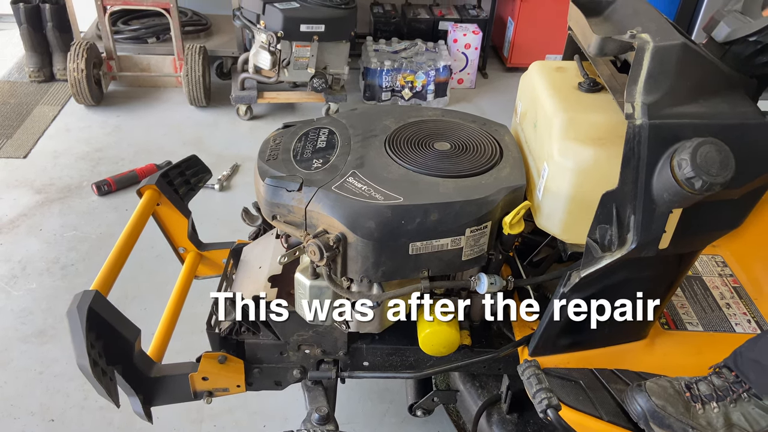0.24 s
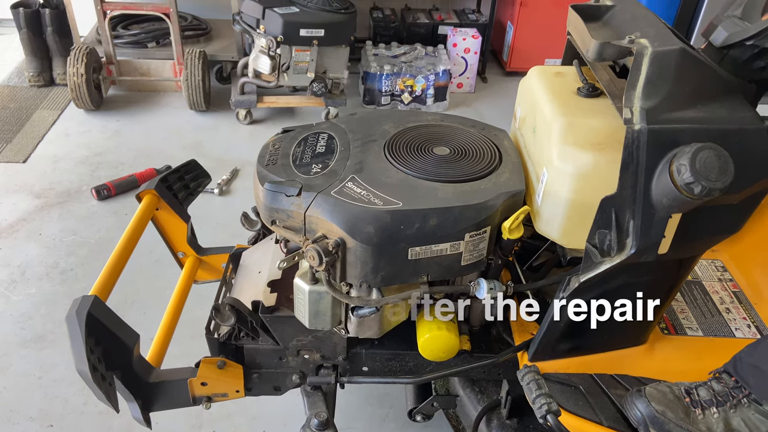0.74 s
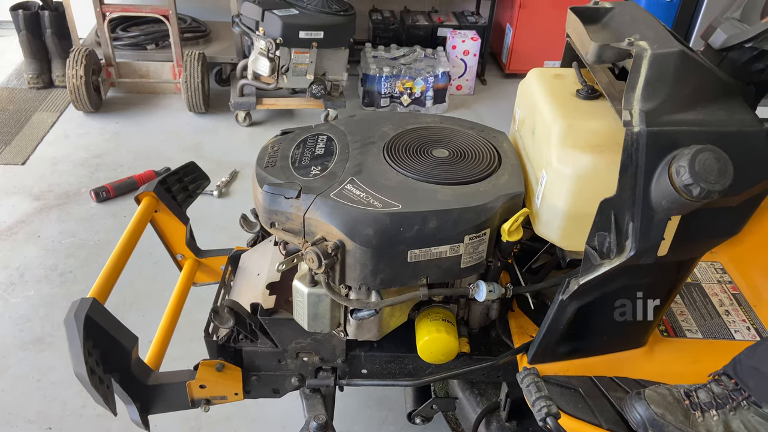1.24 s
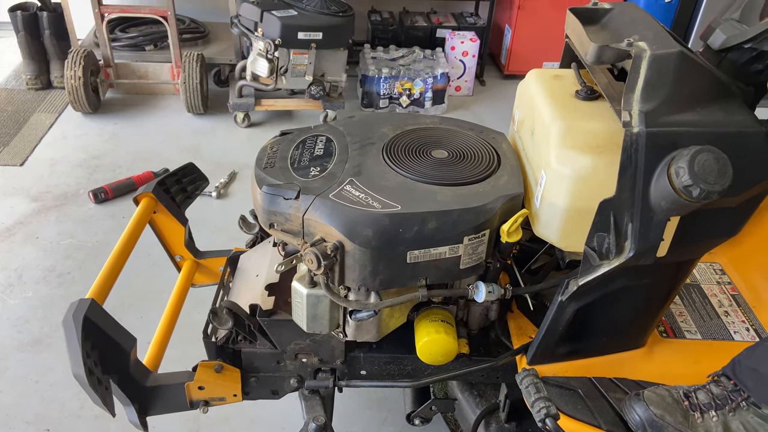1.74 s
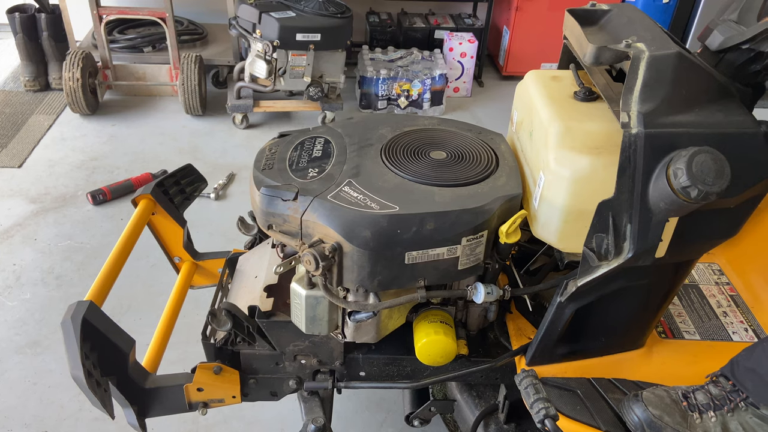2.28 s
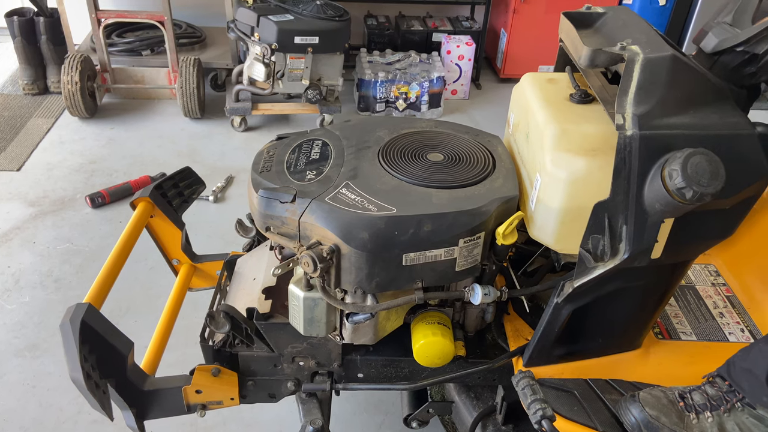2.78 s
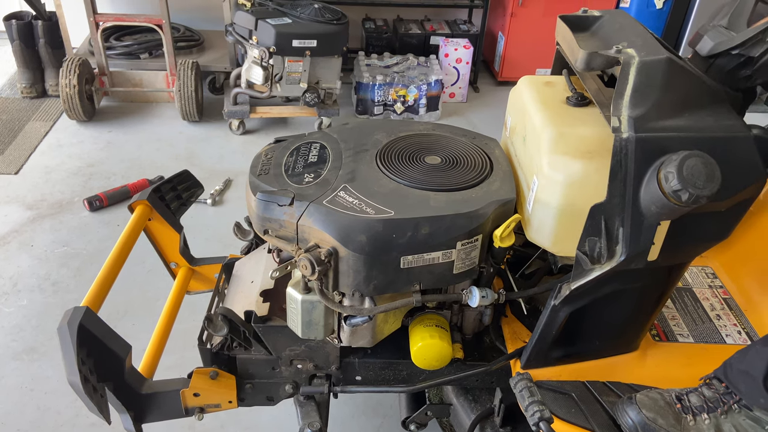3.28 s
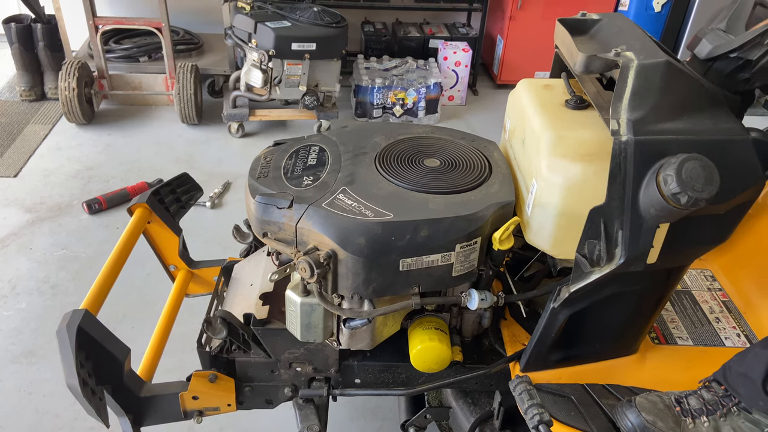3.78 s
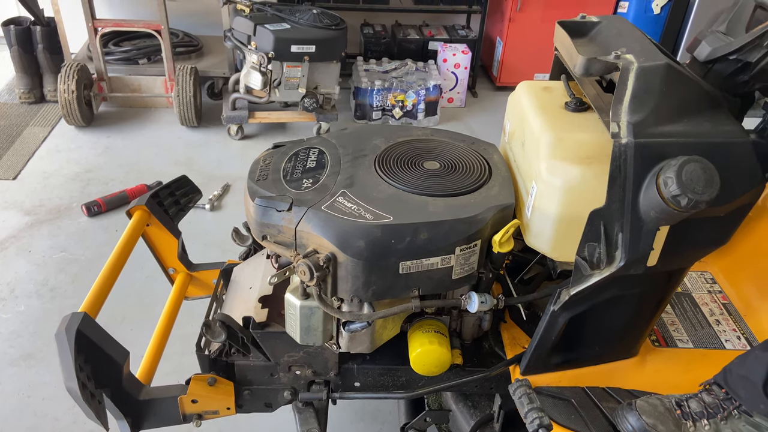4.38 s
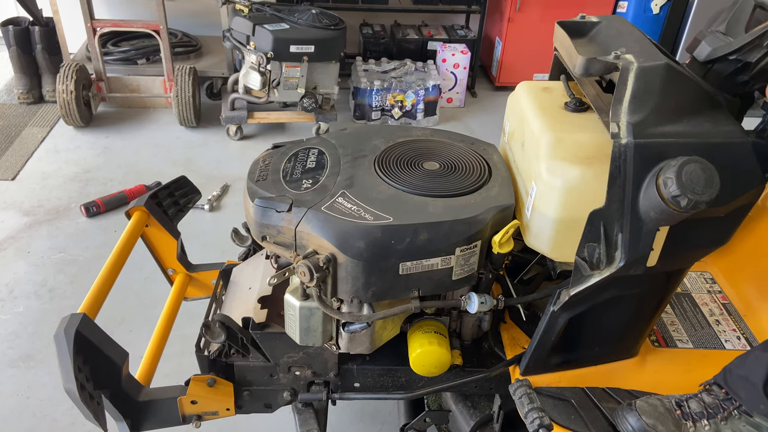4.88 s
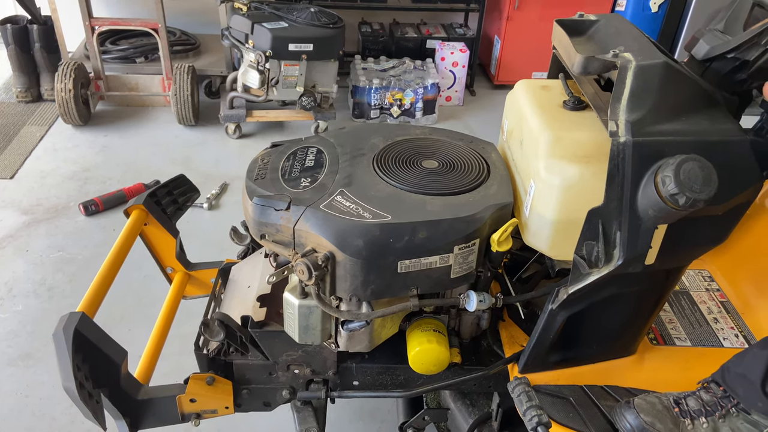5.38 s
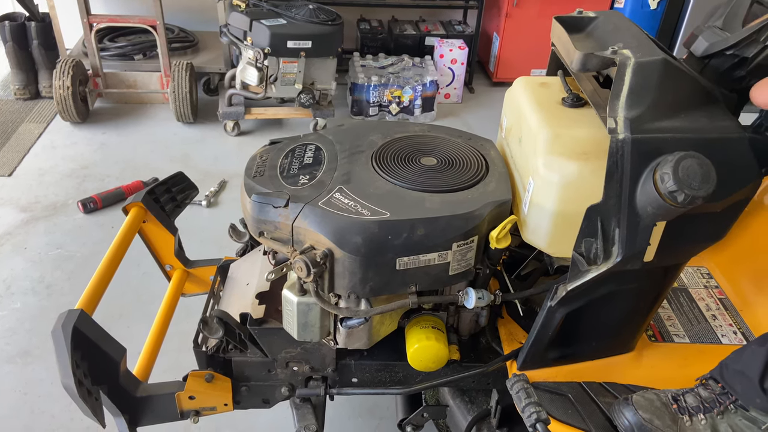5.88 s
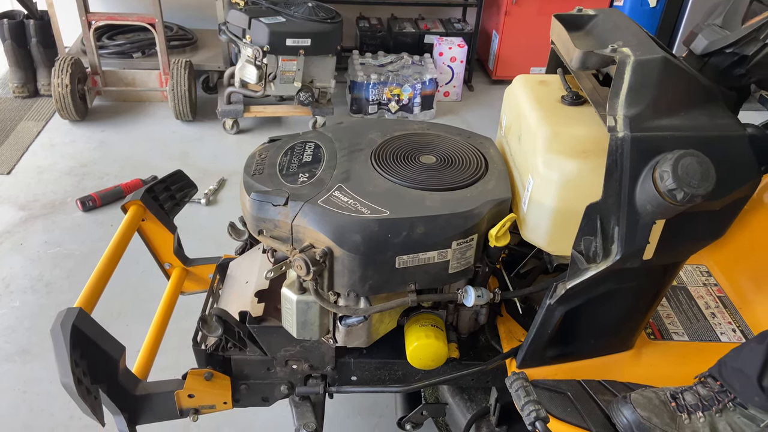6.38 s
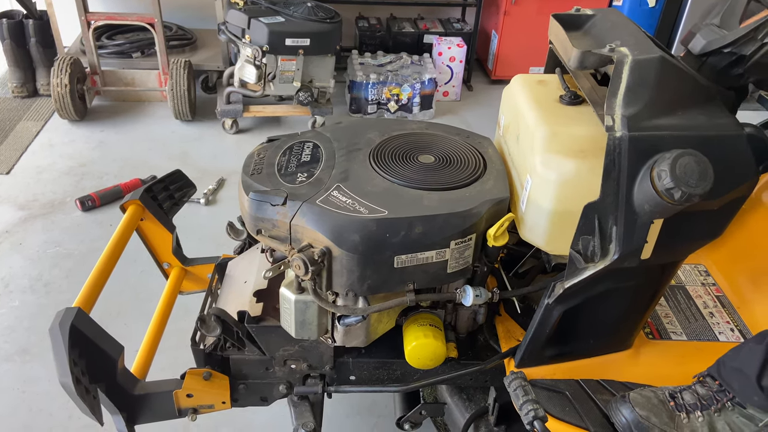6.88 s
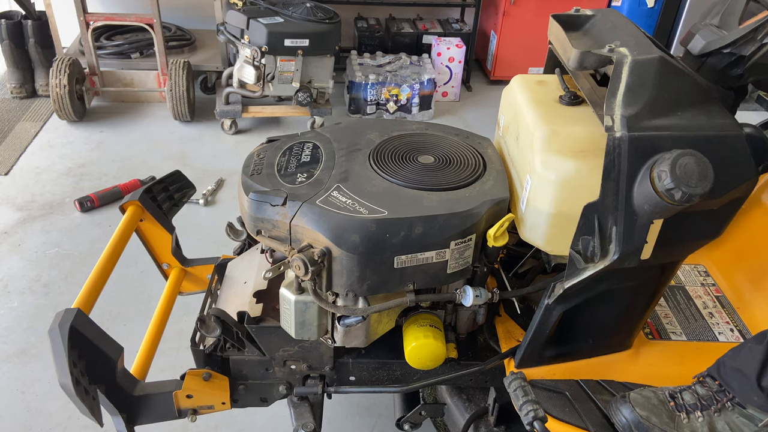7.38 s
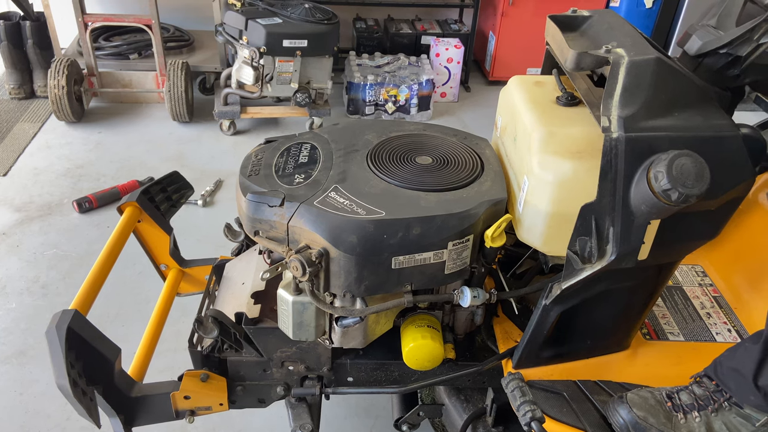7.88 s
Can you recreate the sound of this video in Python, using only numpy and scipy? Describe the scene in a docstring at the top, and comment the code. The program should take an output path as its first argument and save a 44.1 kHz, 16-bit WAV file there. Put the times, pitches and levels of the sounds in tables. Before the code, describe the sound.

Small V-twin mower engine starts, idles fast and lumpy, snorts into two held high-speed runs with falls between, then is switched off.

```python
"""A starter whirrs, a small V-twin petrol engine catches, and it runs up to a fast idle with uneven chugging.
The throttle opens and the intake snorts; held speed is a drone, and the fall back to idle is a hum, then chugs.
A second rev-up does the same; at last the ignition goes off and the engine coasts down.
The exhaust is made of muffler rings and of tones at multiples of the engine cycle.
Fan, valves and tinwork are shaped noise, with knocks, taps and whistles, that follow the crank speed."""
import sys
import numpy as np
from scipy import signal
from scipy.fft import rfft, irfft, next_fast_len
from scipy.io import wavfile
from scipy.ndimage import uniform_filter1d

SR = 44100
rng = np.random.default_rng(int(sys.argv[2]) if len(sys.argv) > 2 else 0)


def unload_audio(sound):
    """Save the sound as a 16-bit wav file, at the path given as the first command line argument."""
    columns = np.transpose(np.atleast_2d(sound))
    # keep every value between -1 and 1, then stretch to whole-number steps
    steps = np.round(np.clip(columns, -1, 1) * 32767)
    wavfile.write(sys.argv[1], SR, steps.astype(np.int16))


N = 358974
T = np.arange(N) / SR  # time [s]

# each rev-up: (throttle opens [s], governed speed reached [s], throttle shuts [s],
# governed speed [rpm], sag [rpm per s])
REV_UPS = [(1.038, 1.256, 2.342, 3102.1, 18.1), (4.191, 4.543, 6.453, 3108.5, 18.9)]
# tinwork that colours the noise: (frequency [Hz], width [Hz], boost [dB])
TINWORK = [(423, 25, 4.5), (923, 11.5, 5), (1227, 19, 4.5), (1790, 48, 0), (4520, 310, 2.5)]
IGNITION_OFF_S = 7.771
SECOND_PLACE = 270 / 720  # the second cylinder fires 270 of the 720 crank degrees into the cycle
CYLINDER_PLACES = (0, SECOND_PLACE)


def gain_of(db):
    """Turns decibels into a factor."""
    return 10 ** (np.asarray(db) / 20)


def evened(x):
    """Scales a signal to an rms of 1."""
    return x / np.sqrt(np.mean(x ** 2) + 1e-20)


def ramp(start, length):
    """Rises from 0 to 1 over a length of time, both in seconds."""
    return np.clip((T - start) / length, 0, 1)


def read(points, hz):
    """Reads a spectrum between its points on a log-frequency axis."""
    f, value = np.transpose(points)
    return np.interp(np.log(hz + 1), np.log(f + 1), value)


def drift(hz):
    """Slow random wandering of rms 1, no faster than about hz."""
    lowpass = signal.butter(2, hz, fs=SR / 100, output="sos")
    slow = signal.sosfiltfilt(lowpass, rng.standard_normal(N // 100 + 1))
    return evened(slow).repeat(100)[:N]


def coloured(points, bumps=()):
    """Two unrelated noises with one spectrum: a smooth curve with resonance bumps on it."""
    size = next_fast_len(N)
    hz = np.fft.rfftfreq(size, 1 / SR)
    db = read(points, hz) + sum(d / (1 + (2 * (hz - f) / w) ** 2) for f, w, d in bumps)
    white = rfft(rng.standard_normal((2, size)))
    return evened(irfft(white * gain_of(db), size)[:, :N])


def sounding(rows, fade):
    """Gain that slides from a start to an end level in each row and fades at both ends."""
    total = 0
    for start, end, start_db, end_db in rows:
        slide = gain_of(start_db + (end_db - start_db) * ramp(start, end - start))
        total = total + slide * ramp(start, fade) * (1 - ramp(end - fade, fade))
    return total


def gate(turns, depth, place, sharp):
    """Level swing within a cycle: one puff a cylinder that jumps up and dies away."""
    puffs = sum(np.exp(-((turns - place - p) % 1) / sharp) for p in CYLINDER_PLACES)
    return evened(1 + depth * puffs)


def orders(turns, table, lag, waver_db, bend=0, drag=0, twist=0, second=0.93):
    """Tones at multiples of the cycle, phased as a pair of blows the pipe smears; each wavers in level."""
    total = 0
    for k, db in table:
        pair = np.angle(1 + second * np.exp(-2j * np.pi * k * SECOND_PLACE))
        smear = bend * (k - 4.5) ** 2 + twist * (k - 4.5) ** 3 + drag * max(5 - k, 0)  # in turns
        level = gain_of(db + waver_db * drift(4.7))
        wave = np.cos(2 * np.pi * (k * turns + lag) + pair - 2 * np.pi * smear)
        total = total + np.sqrt(2) * level * wave
    return total


def crank_rpm():
    """Catch, then each rev-up climbs, is held by the governor and falls back to idle; at last it coasts."""
    # the engine catches and runs up to a fast idle: (time [s], crank speed [rpm])
    run_up = [(0, 976.9), (.15, 1129.3), (.3, 1584.2), (.6, 2044.2), (.75, 2153.2), (.9, 2178.3),
              (1.04, 2128.7)]
    # climb to governed speed: (share of the climb's time [0-1], share of its rpm [0-1])
    climb_curve = [(0, 0), (.3, .234), (.75, .793), (1, 1)]
    # fall to idle: (time after the throttle shuts [s], share of rpm above idle [0-1])
    fall_curve = [(0, 1), (.12, .85), (.6, .316), (.75, .22), (1.05, .068), (1.3, 0)]
    idle_rpm, coast_rpm_per_s = 1779.7, 1101
    rpm = np.interp(T, *np.transpose(run_up))
    for opens, reached, shuts, top, sag in REV_UPS:
        held = top - sag * np.clip(T - reached, 0, shuts - reached)
        climb = np.interp(ramp(opens, reached - opens), *np.transpose(climb_curve))
        fall = np.interp(T - shuts, *np.transpose(fall_curve))
        rising = rpm + (held - rpm) * climb
        falling = idle_rpm + (held - idle_rpm) * fall
        rpm = np.where(T < shuts, rising, falling)
    return rpm - coast_rpm_per_s * np.maximum(T - IGNITION_OFF_S, 0)


def spread(pair_in):
    """Two microphones: they share part of each sound, with a lead and a lean that depend on frequency."""
    # likeness of the two sides: (frequency [Hz], share in common [0-1])
    likeness = [(60, 0.89), (130, 0.91), (300, 0.62), (700, 0.39), (1700, 0.47), (2800, 0.4), (4500, 0.075),
                (6000, 0.012), (7000, 0.74), (9300, 0.92), (11000, 0.43), (12200, 1), (13300, .97),
                (14200, 0.75), (15200, 1)]
    # how far left is ahead: (frequency [Hz], phase [radians])
    left_lead = [(0, 0), (1400, 0), (2600, 1), (4200, 0.5), (5300, -2.5), (6700, -0.56), (8500, -2),
                 (9500, -3), (10400, -6.5), (11900, -6), (12600, -9), (14100, -8.5), (14600, -11)]
    # how much louder left is: (frequency [Hz], left over right [dB])
    left_lean = [(40, -7), (60, -9), (130, 8.5), (290, -1.5), (640, 1.5), (1410, 0), (3100, 3), (6820, 2.5),
                 (15000, -1)]
    patchy_db = 1.1  # parts of the spectrum swell and sink for a moment
    hz, _, z = signal.stft(pair_in, SR, nperseg=1024)
    patches = rng.standard_normal(z.shape[1:])
    patches = uniform_filter1d(uniform_filter1d(patches, size=7, axis=0), size=2, axis=1)
    z = z * gain_of(patchy_db * evened(patches))
    # each side takes half of the lean and half of the lead
    turn = gain_of(read(left_lean, hz) / 2) * np.exp(.5j * np.interp(hz, *np.transpose(left_lead)))
    turn = turn[:, None]
    same = np.clip(read(likeness, hz), 0, 1)[:, None]
    left = z[0] * turn
    right = (same * z[0] + np.sqrt(1 - same ** 2) * z[1]) / turn
    return signal.istft(np.array([left, right]), SR, nperseg=1024)[1][:, :N]


def starter():
    """Starter gears whirr: noise with metallic resonances that swells a little, then fades out."""
    # gear noise: (frequency [Hz], level [dB per Hz])
    gear_noise = [(150, -30), (500, -20), (1400, -1.5), (3500, -9.5), (8000, -20), (16000, -28)]
    # resonances: (frequency [Hz], width [Hz], boost [dB])
    gear_rings = [(990, 40, 5), (1370, 70, 12), (2080, 180, 9), (2440, 40, 7), (2610, 50, 9),
                  (3400, 120, 11), (3630, 50, 9), (4460, 60, 7)]
    swell = gain_of(-30.0 + 6.4 * ramp(0.045, 0.069))
    fade_out = np.clip((.42 - T) / 0.25, 0, 1)
    return coloured(gear_noise, gear_rings) * swell * fade_out


def tones(turns, pace):
    """Fan blades sing on high multiples of the cycle; fuzzy whistles keep their pitch and flutter."""
    # fan tones: (multiple of the cycle, level at full speed [dB])
    fan_tones = [(36, -46), (42, -50), (64, -52.5), (72, -45)]
    # whistles: (frequency [Hz], width [Hz], level at idle [dB], level at speed [dB],
    # extra level, doubled in the first second [dB], clean share [0-1], pitch wander [Hz], coming and going [dB])
    steady_whistles = [(1233, 20, -46, -54, 0, .5, 8, 2), (2732, 30, -40.5, -58, -8, .6, 20, 2),
                       (4630, 90, -51, -55, 0, .3, 30, 0), (5472, 50, -46.5, -45.5, 4.5, .55, 10, .5)]
    flutter_db, flutter_hz = 2, 22
    out = orders(turns, fan_tones, .3, 1.8) * pace ** 3 * np.ones((2, 1))
    fades = np.clip(T / 0.16, 0, 1) * np.clip((9 - T) / 1.35, 0, 1)
    for hz, width, slow_db, fast_db, extra_db, clean, wander_hz, fitful_db in steady_whistles:
        a, b = rng.standard_normal((2, 2, N))
        r = np.exp(-np.pi * width / SR)
        fuzz = signal.lfilter([1], [1, -2 * r, r * r], a + 1j * b)
        # a clean core in narrow noise, moved up to the whistle's pitch
        core = clean * np.array([[1], [1j]]) + (1 - clean) * fuzz / np.std(fuzz)
        phase = 2j * np.pi * np.cumsum(hz + wander_hz * drift(11.88)) / SR
        whistle = evened((core * np.exp(phase)).real)
        level_db = slow_db + (fast_db - slow_db) * pace + extra_db * (2 - ramp(1, .3))
        level_db = level_db + flutter_db * drift(flutter_hz) + fitful_db * np.minimum(drift(7.3), 1)
        out = out + gain_of(level_db) * whistle * fades
    return out


def roar_db(pace, idle_db, full_db, after_start_db, open_db):
    """Roar level rises with speed and open throttle; it is raised after the start and eases off slowly."""
    bend, ease_db_per_s, settle_s = 0.76, 0.1527, 0.75
    first_fire_s, cranking_db = 0.19, -9.5  # quieter until the cylinders fire
    wide = sum(ramp(opens, 0.0089) * (1 - ramp(reached - .05, 0.028)) for opens, reached, *_ in REV_UPS)
    start = after_start_db * np.exp(-T / settle_s) + cranking_db * (1 - ramp(first_fire_s - .1, 0.18))
    coast = -6.5 * np.maximum(T - IGNITION_OFF_S, 0)  # dB per s with the ignition off
    speed = idle_db + (full_db - idle_db) * pace ** bend
    return speed - ease_db_per_s * T + start + open_db * wide + coast


def low_roar_db(pace):
    """Level of the low roar, which the valve knocks follow too."""
    return roar_db(pace, idle_db=-26.5, full_db=-24, after_start_db=6, open_db=3)


def roar(turns, pace):
    """Fan, valve gear and tin: noise that brightens with speed and throbs with the cycle."""
    # roar at speed: (frequency [Hz], level [dB per Hz])
    fast_noise = [(100, -15.5), (200, -14.5), (330, -16.5), (620, -19), (1000, -21), (2000, -26),
                  (4000, -33), (7200, -39), (9300, -43.5), (11000, -42.5), (13400, -50.5), (16000, -48.5)]
    # roar at idle: (frequency [Hz], level [dB per Hz])
    slow_noise = [(100, -15), (200, -15.5), (300, -16), (540, -21.5), (1230, -22.5), (1860, -30.5),
                  (3500, -35), (5450, -37.5), (9300, -45.5), (11000, -44), (13400, -52), (16000, -50)]
    # tinwork that shows at idle, under the quieter roar: (frequency [Hz], width [Hz], boost [dB])
    idle_tinwork = [(794, 17, 7), (1690, 16, 0), (2540, 120, 5.5), (2870, 71, 6.5), (3080, 57, 5.5),
                    (3680, 80, 3.5), (4160, 31, 6.5), (6600, 190, 2)]
    # unsteady gas flow: (frequency [Hz], level [dB per Hz])
    gas_flow = [(35, -30), (55, -3), (130, 0), (230, -5), (330, -25), (500, -60)]
    rumble_db, rumble_ease_db = -29, -6  # the flow steadies at governed speed
    fast = pace * coloured(fast_noise, TINWORK)
    slow = (1 - pace) * gain_of(2.0) * coloured(slow_noise, TINWORK + idle_tinwork)
    noise = fast + slow
    low = signal.sosfiltfilt(signal.butter(1, 1700, fs=SR, output="sos"), noise)
    high = noise - low
    # level each band out over a third of a second, then give it its throb and loudness
    low = low / np.sqrt(uniform_filter1d(low[0] ** 2, SR // 3))
    high = high / np.sqrt(uniform_filter1d(high[0] ** 2, SR // 3))
    low = low * gate(turns, 0.05, 0.044, 0.022) * gain_of(low_roar_db(pace))
    high_db = roar_db(pace, idle_db=-36.5, full_db=-28, after_start_db=12.5, open_db=1.5)
    high = high * gate(turns, 0.46, 0.94, 0.065) * gain_of(high_db)
    rumble = coloured(gas_flow) * gain_of(rumble_db + rumble_ease_db * np.sqrt(pace))
    return low + high + rumble * np.clip(T / 0.28, .1, 1)


def rattle(turns, pace):
    """A burst of small taps after each firing; every tap rings one patch of loose tin."""
    # patches of tin: (frequency [Hz], relative level [dB], time to fall by 60 dB [s])
    tin_patches = [(807, -2, .07), (980, 0, .08), (1233, 0, .09), (1394, -4, .06), (1647, -6, .07),
                   (1850, -8, .05), (2110, -9, .05), (2570, -11, .05), (3133, -12, .05), (4078, -14, .06)]
    idle_db, full_db = -34, -35
    taps_per_s, spread_db = 2200, 1.5
    dying_share = .25  # share of the cycle over which the shaking dies
    shaken = sum(np.exp(-((turns - p) % 1) / dying_share) for p in CYLINDER_PLACES)
    chance, size, patch = rng.random((3, 2, N))
    taps = (chance < shaken * taps_per_s / SR) * gain_of(-spread_db * np.log(size + 0.1))
    patch = (patch * len(tin_patches)).astype(int)
    t = np.arange(SR // 10) / SR
    out = 0
    for k, (hz, db, t60) in enumerate(tin_patches):
        ring = gain_of(db - 60 * t / t60) * np.sin(2 * np.pi * hz * t)
        out = out + signal.oaconvolve(taps * (patch == k), ring[None], axes=1)[:, :N]
    level = gain_of(idle_db + (full_db - idle_db) * pace)
    return evened(out) * level * ramp(.1, 0.29) * (1 - ramp(IGNITION_OFF_S, 1.0))


def knocks(turns, pace):
    """Valve gear knocks four times a cycle, a little early or late, with tin-coloured noise bursts."""
    # knock noise: (frequency [Hz], level [dB per Hz])
    knock_noise = [(300, -32), (600, -1.5), (1100, -5), (2000, -7), (3500, -10.5), (7000, -34)]
    per_cycle, decay_s, spread_db = 4, 0.0046, -0.5
    slop = .3  # timing error, in shares of the spacing
    below_roar_db = -11.5  # against the low roar
    beat = per_cycle * turns + slop * drift(20)
    sizes = gain_of(spread_db * np.minimum(rng.exponential(1, N), 2))
    blows = np.append(np.diff(np.floor(beat)) > 0, 0) * sizes
    shape = evened(signal.lfilter([1], [1, -np.exp(-1 / (decay_s * SR))], blows))
    return coloured(knock_noise, TINWORK) * shape * gain_of(below_roar_db + low_roar_db(pace))


def snorts():
    """Short bursts of noise: a few knocks while the starter turns, then air rushing through the open throttle
    in gusts; they bark and rattle the tin, which rings on."""
    # gusts: (time [s], level [dB], bark level [dB], ring frequency [Hz], ring level [dB])
    gusts = [(0.0822, -35, -40, 1400, -25), (0.1377, -22, -19, 1340, -19), (0.214, -22.5, -24, 1450, -22),
             (0.251, -15.5, -15, 1180, -29), (1.0143, -20, -23, 1200, -26), (1.067, -9.5, -18, 1180, -13),
             (1.088, -21, -11, 2300, -17), (1.118, -13, -33, 800, -15), (1.136, -16.5, -10, 1490, -14),
             (1.164, -13.5, -26, 940, -14), (1.181, -18, -26, 810, -9), (1.206, -14.5, -32, 1090, -19),
             (1.2244, -26, -36, 920, -28), (4.2317, -16, -16, 1120, -15), (4.2726, -13.5, -26, 945, -11),
             (4.2968, -15.5, -11, 2200, -25), (4.328, -13, -18, 2200, -10), (4.3505, -13.5, -12, 2300, -19),
             (4.3794, -11, -16, 1370, -19), (4.397, -29, -16, 1340, -17), (4.4234, -13, -29, 1640, -22),
             (4.44, -19, -22, 1110, -19), (4.466, -26, -28, 961, -24), (4.504, -27, -27, 966, -24)]
    # rushing air: (frequency [Hz], level [dB per Hz])
    air_noise = [(250, -2.5), (400, -0.5), (800, -18.5), (1500, -16), (2700, -16.5), (5000, -14.5),
                 (7400, -16), (9300, -16.5), (11000, -14.5), (13000, -20), (16000, -23)]
    # tin rattled by the air: (frequency [Hz], width [Hz], boost [dB])
    clatter_tin = [(1680, 250, 8), (2240, 250, 9), (4620, 250, 4), (5470, 110, 3), (6760, 150, 5)]
    # tin that rings on afterwards: (frequency [Hz], width [Hz], boost [dB])
    linger_tin = [(2240, 200, 6), (4570, 200, 13), (6760, 170, 6)]
    # bark: (frequency [Hz], level [dB per Hz])
    bark_noise = [(500, -13), (1000, 1.5), (1700, -0.5), (2400, -0.5), (3200, -8), (5000, -48)]
    rise_s, hold_s, t60_s = 0.0014, 0.0017, 0.11
    linger_db, linger_t60_s = -17, 0.47
    ring_rise_s, ring_t60_s = 0.0011, 0.042
    bark_s = 0.0012  # time to the bark's peak
    shape, tail, barks = np.zeros((3, N))
    ringing = np.zeros((2, N))
    for s, db, bark_db, hz, ring_db in gusts:
        at = slice(round(s * SR), round((s + 1) * SR))
        after = np.maximum(T[at] - s, 0)
        rise = gain_of(db) * (1 - np.exp(-after / rise_s))
        shape[at] += rise * gain_of(-60 * np.maximum(after - hold_s, 0) / t60_s)
        tail[at] += rise * gain_of(linger_db - 60 * after / linger_t60_s)
        barks[at] += gain_of(bark_db) * after / bark_s * np.exp(1 - after / bark_s)
        swing = np.sin(2 * np.pi * (hz * after + rng.random((2, 1))))
        ring_level = gain_of(ring_db - 60 * after / ring_t60_s) * (1 - np.exp(-after / ring_rise_s))
        ringing[:, at] += ring_level * swing
    rush = coloured(air_noise, clatter_tin) * shape
    linger = coloured(air_noise, linger_tin) * tail
    return rush + linger + coloured(bark_noise) * barks + ringing


def firings(turns, cycles_hz, second_db=3.5):
    """Two cylinders fire 270 degrees apart, each blow of its own size, and ring the muffler."""
    # muffler resonances: (frequency [Hz], width [Hz], relative level [dB])
    muffler_rings = [(77.5, 44, 3.5), (128, 11, -11), (174, 7.9, -11.5), (236, 21, -34), (432, 120, -43)]
    # when single blows stand out: (start [s], end [s], level at start [dB], level at end [dB])
    stumble_times = [(.115, .23, -21.5, -16), (.2, .3, -30, -38), (2.8, 3.4, -22.5, -33),
                     (4.18, 4.32, -23, -28), (6.75, 7.25, -21.5, -25.5), (7.25, 7.8, -42, -51)]
    blows = np.zeros(N)
    size = gain_of(2.2 * rng.standard_normal((200, 2)))
    for k, (place, db) in enumerate([(0, 0), (SECOND_PLACE, second_db)]):
        at = np.flatnonzero(np.diff(np.floor(turns - place)) > 0)
        blows[at] = gain_of(db) * size[:len(at), k]
    t = np.arange(SR // 5) / SR
    ring = -sum(gain_of(db) * np.exp(-np.pi * w * t) * np.sin(2 * np.pi * hz * t)
                for hz, w, db in muffler_rings)
    # the outlet is too small for deep bass
    ring = signal.sosfilt(signal.butter(2, 65, "high", fs=SR, output="sos"), ring)
    ring = ring / np.linalg.norm(ring)
    strength = sounding(stumble_times, fade=0.088) * np.sqrt(SR / cycles_hz)
    return signal.oaconvolve(blows * strength, ring)[:N]


def exhaust_voices(turns):
    """The exhaust's steady tones: chug at low speed, drone when governed, hum in between, coasting puffs."""
    # tones of each voice: (multiple of the cycle, relative level [dB])
    drone_orders = [(2, -6.5), (3, -7), (4, -6.5), (5, 1.5), (6, -4.5), (7, -2), (8, -10.5), (9, -8),
                    (10, -10.5), (11, -10), (12, -17), (13, -19), (14, -22), (15, -14.5), (16, -10.5),
                    (17, -25), (18, -19), (19, -18), (20, -23)]
    hum_orders = [(2, -19), (3, 0), (4, -19), (5, -8.5), (6, -23), (7, -15), (8, -13.5), (9, -27),
                  (10, -16), (11, -17), (12, -28), (13, -21), (14, -26), (15, -23)]
    chug_orders = [(3, -15), (4, -11.5), (5, 0), (6, -13), (7, -7.5), (8, -2.5), (9, -10), (10, -12),
                   (11, -9), (12, -17), (13, -12), (14, -21), (16, -19)]
    catch_orders = [(4, -13), (5, 0), (6, -8), (7, -8), (8, -6), (9, -13), (10, -8), (11, -9), (13, -9),
                    (15, -16)]  # choked first firings
    coast_orders = [(3, -16), (5, -5), (6, -16), (7, -7), (8, 0), (10, -13), (11, -8), (13, -12)]  # pumping without fire
    # when each voice sounds: (start [s], end [s], level at start [dB], level at end [dB])
    drone_times = [(1.24, 2.41, -17, -17.5), (4.53, 6.5, -19, -19)]
    hum_times = [(1.15, 1.4, -14.5, -31), (2.36, 2.97, -14.5, -20.5), (2.96, 3.1, -14, -27),
                 (4.34, 4.72, -17, -28.5), (6.43, 7.11, -17.5, -21.5)]
    chug_times = [(0.636, 1.05, -13.5, -15.5), (0.99, 1.29, -10, -27.5), (2.996, 3.45, -17, -19.5),
                  (3.424, 4.196, -20, -16.5), (4.203, 4.6, -12, -28), (7.134, 7.83, -21, -19.5)]
    catch_times = [(0.194, .68, -17, -14)]
    coast_times = [(7.78, 8.3, -25.5, -23)]
    drone = evened(orders(turns - .362, drone_orders, .343, .7, -.08, twist=-.006, second=.7))
    # in the hum each multiple below the fifth trails by a further .23 turn
    hum = orders(turns - .14, hum_orders, .19, .8, drag=.23, second=3)
    chug = evened(orders(turns - .143, chug_orders, .21, 1, second=1.25))
    catch = evened(orders(turns - .155, catch_orders, .27, 1, second=1.1))
    coast = evened(orders(turns + .055, coast_orders, .5, 1.3, .09, second=.5))
    uneven = chug * sounding(chug_times, .05) + catch * sounding(catch_times, .05)
    uneven = uneven * gain_of(1.2 * drift(12))  # their strength wavers
    smooth = drone * sounding(drone_times, .05) + hum * sounding(hum_times, .04)
    return uneven + smooth + coast * sounding(coast_times, .05)


def scene():
    """The whole engine at two microphones."""
    idle_hz, full_hz = 15, 25.7  # cycles per second
    cycles_hz = crank_rpm() / 120  # one cycle is two turns of the crank
    turns = np.cumsum(cycles_hz) / SR  # cycles so far
    pace = np.clip((cycles_hz - idle_hz) / (full_hz - idle_hz), 0, 1)
    early = .15 * np.clip((.24 - T) / .08, 0, 1)  # the first blow lands ahead of the later beat
    machinery = starter() + tones(turns, pace) + roar(turns, pace)
    machinery = machinery + rattle(turns - .09, pace) + knocks(turns, pace)
    exhaust = firings(turns - .09 + early, cycles_hz) + exhaust_voices(turns)
    return spread(machinery + snorts()) + exhaust * gain_of([[.2], [-.2]])


def record(dry):
    """The microphone drops the lowest bass and rounds off loud peaks; then the top of the band is cut."""
    thin = signal.sosfiltfilt(signal.butter(3, 37, "high", fs=SR, output="sos"), dry)
    rounded = np.tanh(thin * .8) / .8
    band_limit = signal.firwin(511, 16000, window=("kaiser", 9), fs=SR)
    return signal.oaconvolve(rounded, band_limit[None], "same")


dry = scene()
out = record(dry)
unload_audio(out)
```